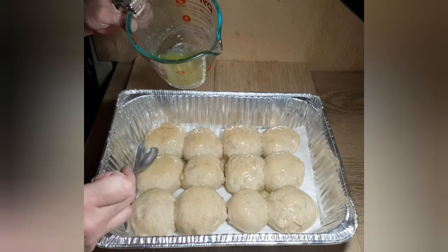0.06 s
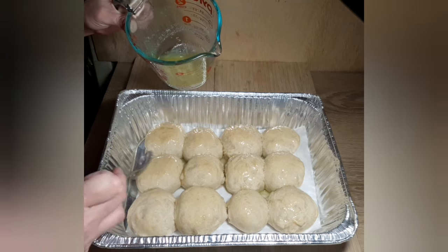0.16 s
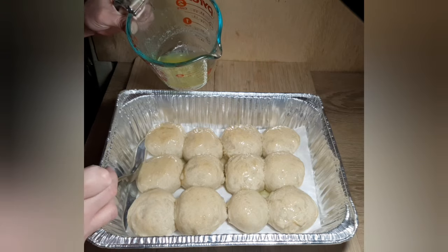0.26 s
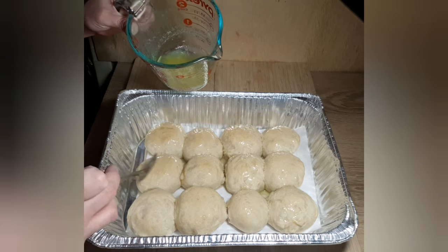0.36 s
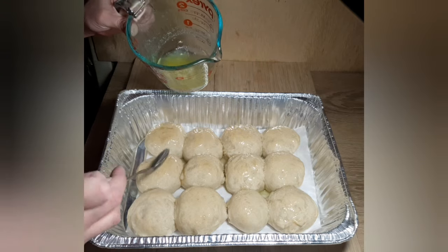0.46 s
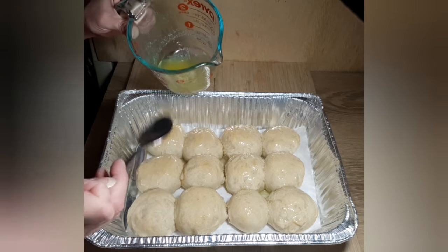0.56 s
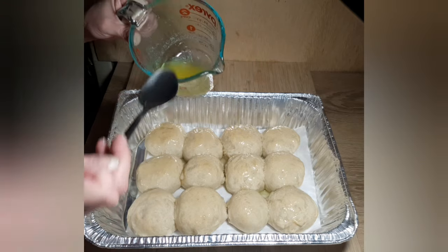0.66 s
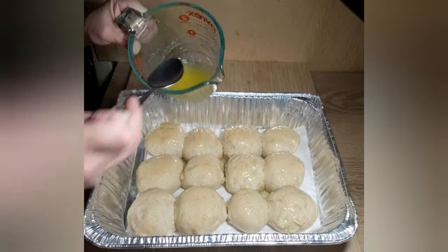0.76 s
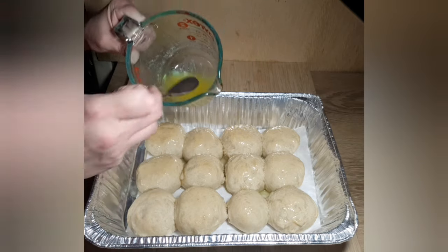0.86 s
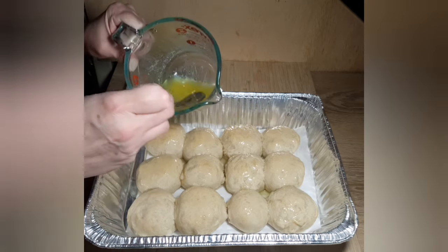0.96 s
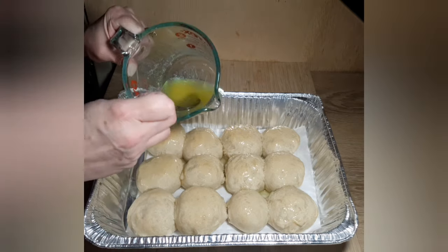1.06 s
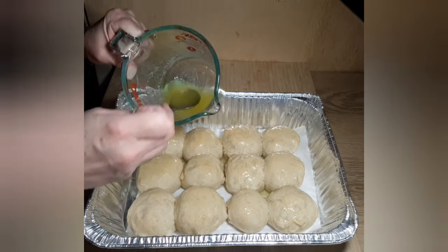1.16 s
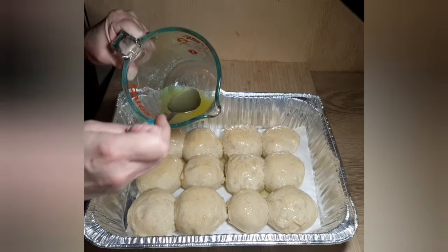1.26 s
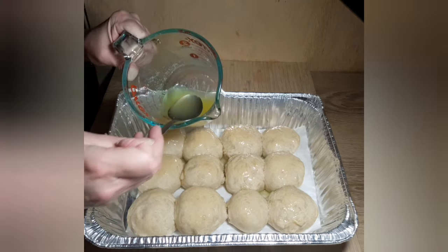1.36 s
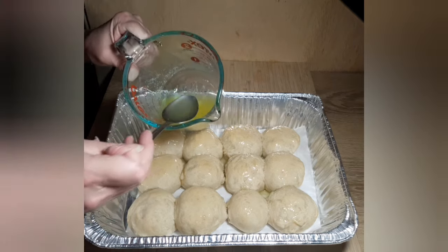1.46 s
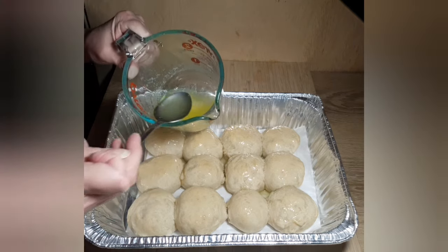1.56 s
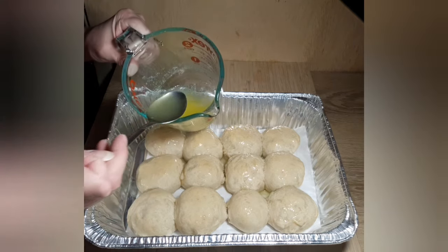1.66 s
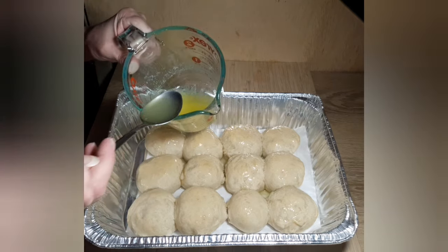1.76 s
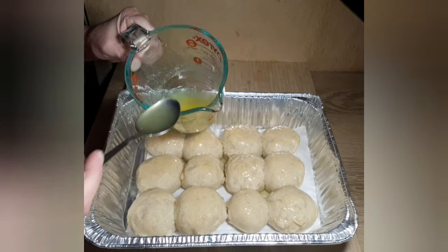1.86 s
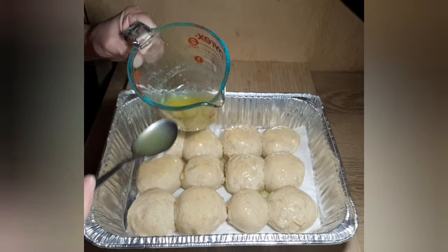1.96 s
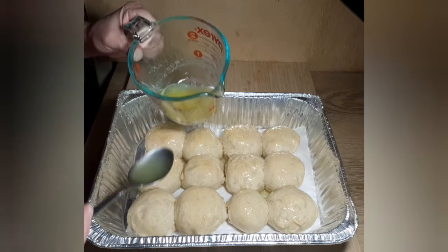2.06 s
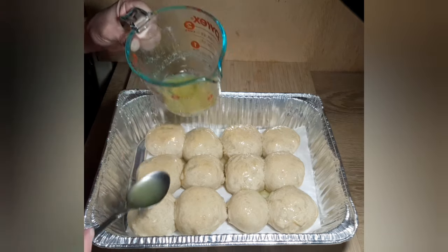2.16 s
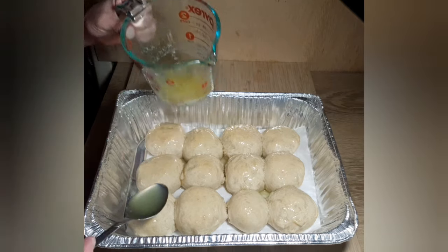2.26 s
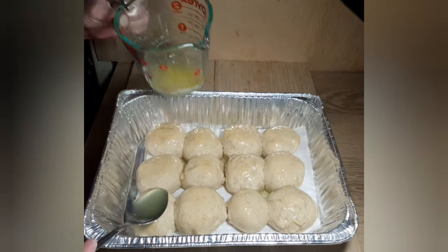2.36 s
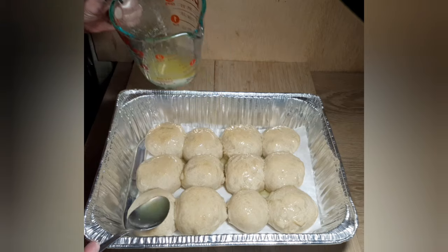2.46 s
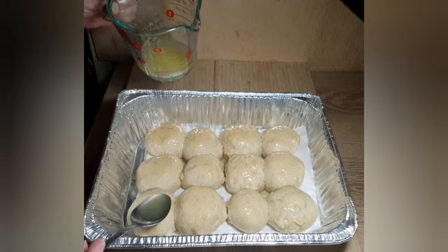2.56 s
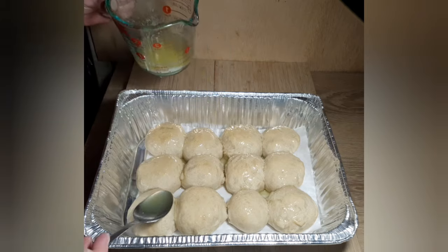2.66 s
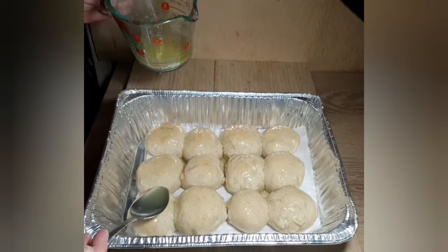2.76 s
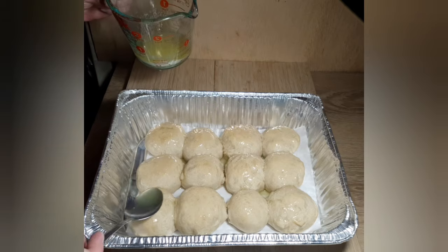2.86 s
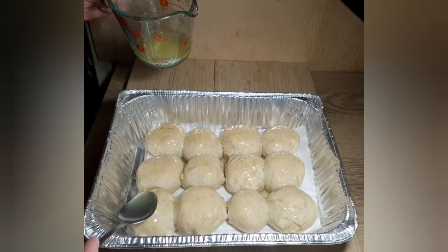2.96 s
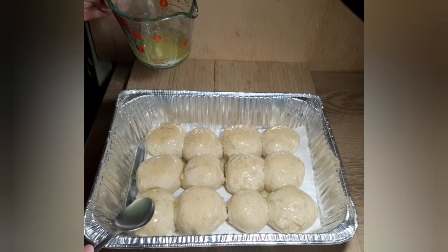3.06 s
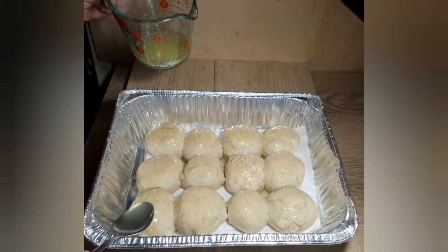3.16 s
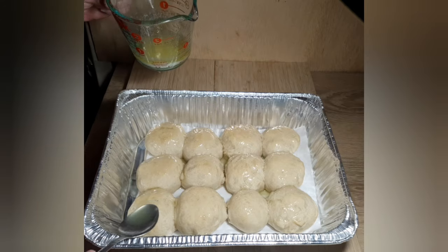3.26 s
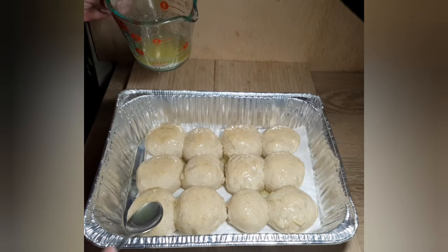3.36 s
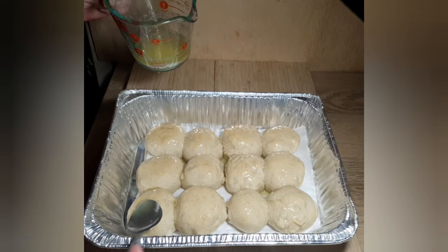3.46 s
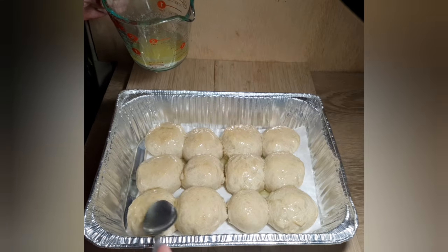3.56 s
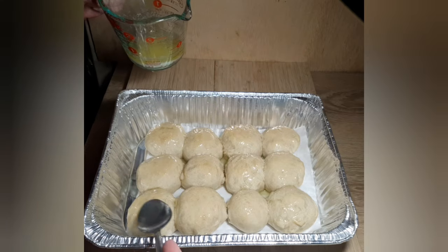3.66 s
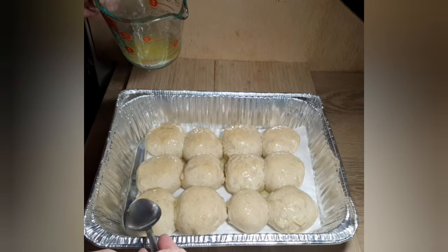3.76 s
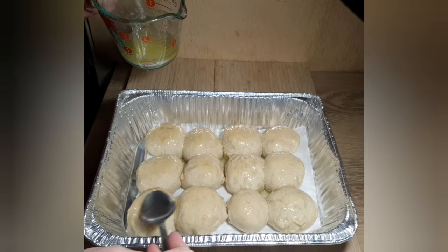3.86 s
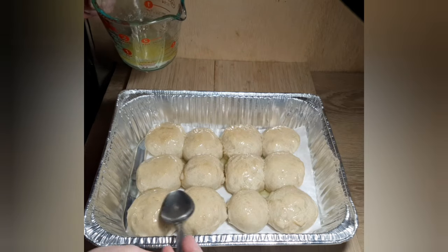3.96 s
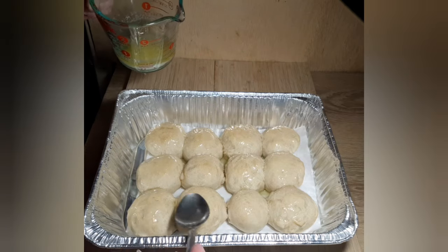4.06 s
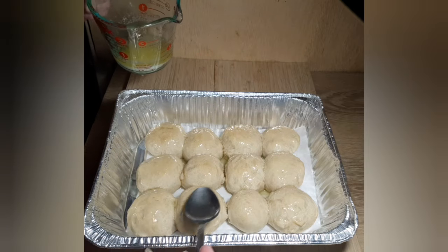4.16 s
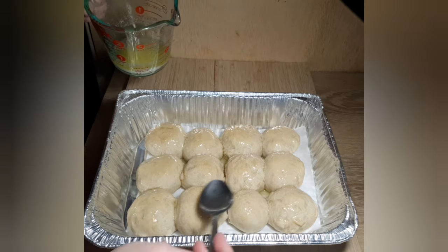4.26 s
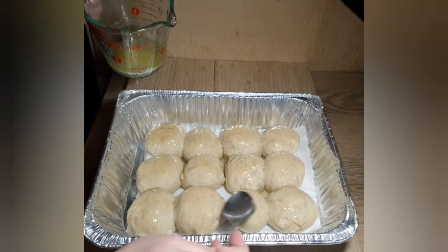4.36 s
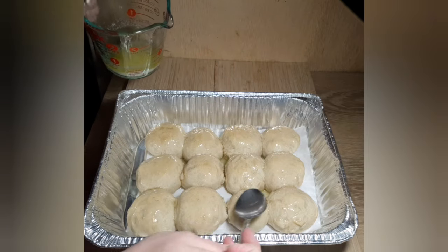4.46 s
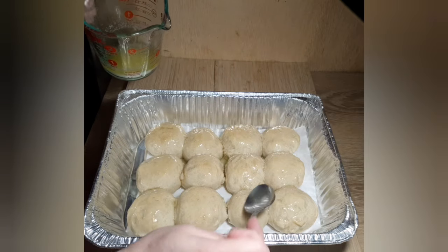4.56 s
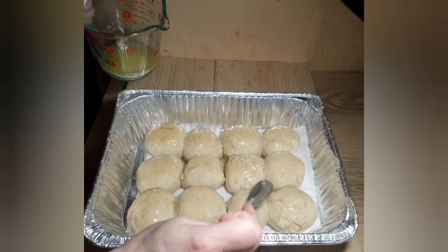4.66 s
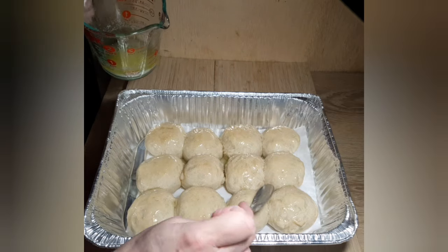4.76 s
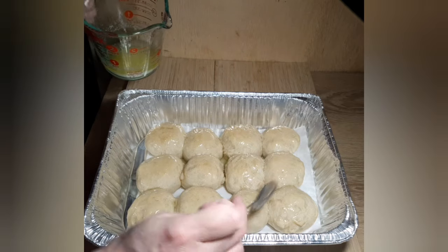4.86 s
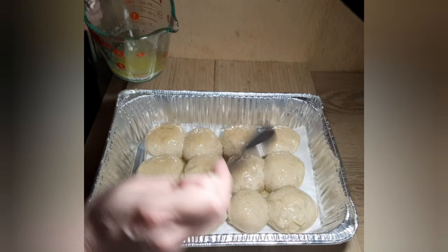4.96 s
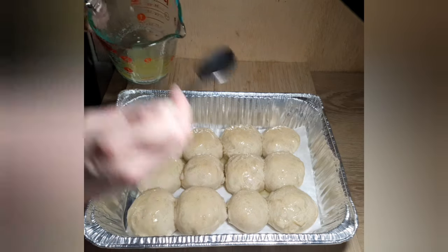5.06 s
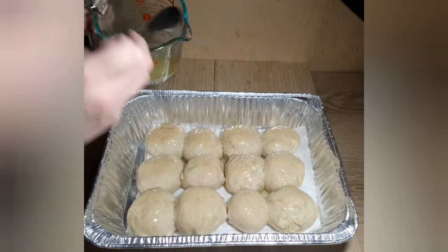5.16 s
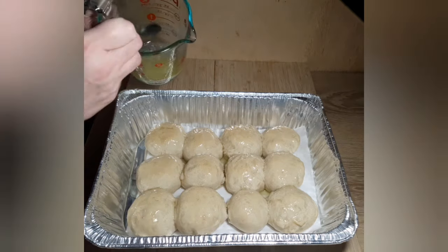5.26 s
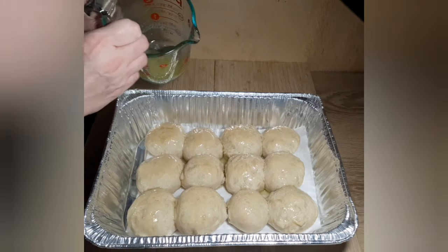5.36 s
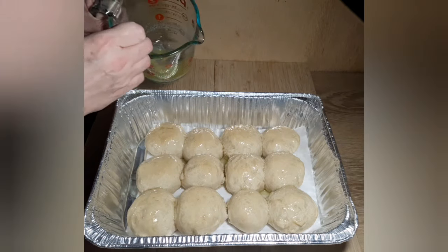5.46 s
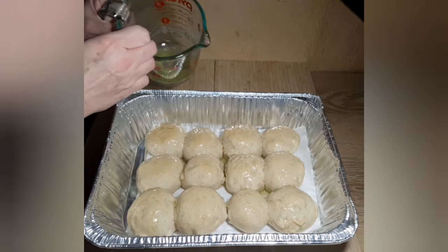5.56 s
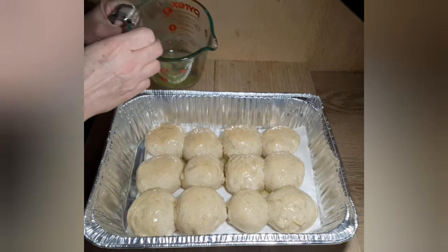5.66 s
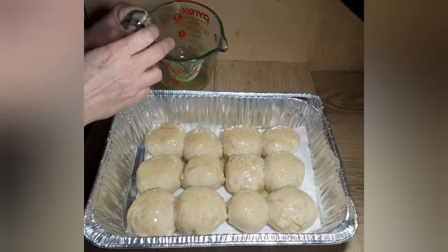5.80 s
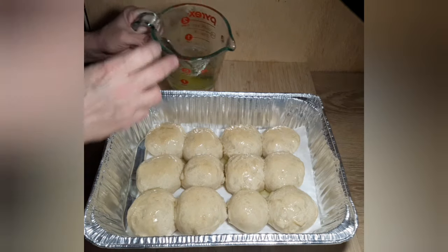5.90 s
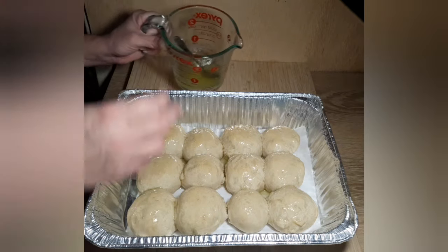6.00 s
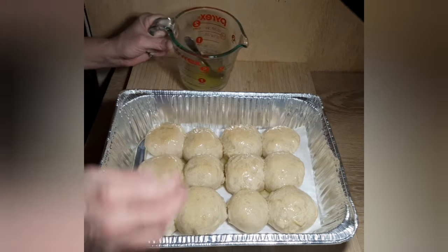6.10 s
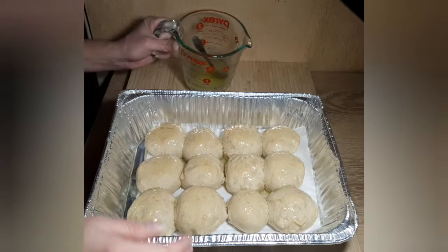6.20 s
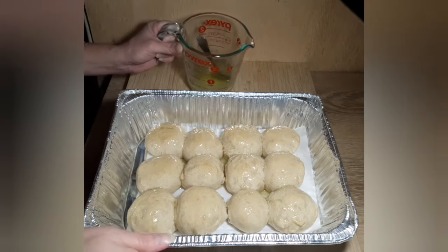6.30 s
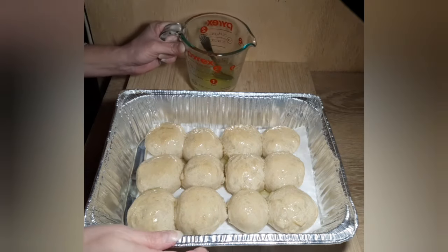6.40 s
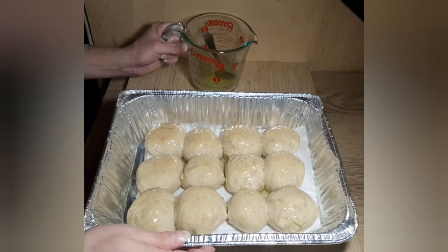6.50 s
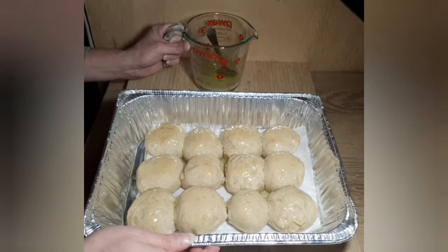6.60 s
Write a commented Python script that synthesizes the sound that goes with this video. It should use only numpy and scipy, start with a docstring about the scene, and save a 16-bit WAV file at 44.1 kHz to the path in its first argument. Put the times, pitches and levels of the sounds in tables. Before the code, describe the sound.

A small, fairly dry kitchen, heard closely in stereo. A refrigerator hums low and quietly throughout, with wavering tones, throbbing rumble, faint hiss and a thin whine. Soft rubbing starts around 0.15 s, with a tiny foil crackle at 0.35 s. A faint spoon tick on thick glass comes at 1.0 s, then a light tilted clink and brief scrape at 1.5 s. From 1.65 to 2.6 s, quick soft brushing strokes repeat about every eighth of a second. At 3.15 s the foil pan pops sharply, crinkling until about 3.35 s. Very faint soft taps and rubs follow from 3.9 to 4.8 s. At 5.5 s the spoon clinks and scrapes glass, hitting loudest and brightest at 5.66 s, with gritty sliding to 5.75 s. Rubbing continues; at 6.3 s the cup knocks on the wooden counter with a glassy clink, and a second dull knock and scrape end it at 6.62 s.

```python
"""A steel spoon clinks on and scrapes along a thick glass measuring cup: blows and sliding grit drive resonant modes.
A foil pan pops and crinkles, with soft taps between, as dying bursts of micro-impacts; the cup is set down on a
wooden counter by short pushes into its modes. Soft rubbing strokes of shaped noise pass between; a refrigerator hums
with wavering tones and throbbing noise. Two spaced microphones hear it all in a small kitchen."""
import sys
import numpy as np
from scipy import signal
from scipy.fft import rfft, irfft, next_fast_len
from scipy.io import wavfile
from scipy.ndimage import uniform_filter1d, map_coordinates

SR = 44100
rng = np.random.default_rng(int(sys.argv[2]) if len(sys.argv) > 2 else 0)


def dump_mix(stems):
    """Bounce the given channels to the path in sys.argv[1] as a 16-bit WAV at rate SR."""
    frames = np.atleast_2d(stems).T  # one column per channel
    limited = np.clip(frames, -1, 1)  # hard clip at full scale
    pcm = np.round(limited * 32767).astype(np.int16)
    wavfile.write(sys.argv[1], SR, pcm)


N = 292559
T = np.arange(N) / SR  # time [s]


def amp(db):
    """Decibel law: level [dB] to amplitude gain."""
    return 10 ** (np.asarray(db) / 20)


def unit(x):
    """Power normalisation: x at rms 1."""
    return x / np.sqrt(np.mean(x ** 2) + 1e-20)


def along(points, hz):
    """Logarithmic frequency scale: interpolate (frequency [Hz], value) points on it."""
    f, v = np.transpose(points)
    return np.interp(np.log(hz + 1), np.log(f + 1), v)


def strokes(rows, rise_s):
    """Power addition of strokes that rise, hold and fade: joint gain, and colour column weighted by power."""
    total, tint = np.zeros((2, N))
    for start, hold, db, colour, fade in rows:
        span = slice(round(start * SR), round(start * SR) + SR)
        age = T[:len(T[span])]
        rise = np.clip(age / rise_s, 0, 1) ** 2
        fall = amp(db - fade * np.clip(age - rise_s - hold, 0, None))
        power = (fall * rise) ** 2
        total[span] += power
        tint[span] += power * colour
    return np.sqrt(total), tint / (total + 1e-30)


def wobble(rate):
    """Slow random modulation: a smooth curve through `rate` random knots a second."""
    knots = rng.standard_normal(int(N * rate / SR) + 4)
    return map_coordinates(knots, [T * rate])


def filtered(x, response):
    """Linear filtering: the spectrum of x times a complex response of frequency, zero-padded."""
    m = next_fast_len(N + SR // 2)
    return irfft(rfft(x, m) * response(np.fft.rfftfreq(m, 1 / SR)), m)[..., :N]


def coloured(x, spectrum):
    """Spectral shaping: x at rms 1 after a smooth spectrum."""
    return unit(filtered(x, lambda hz: amp(along(spectrum, hz))))


def modes(table, widen=1):
    """Modal superposition: causal response of damped resonances, energy 1 for a unit impulse."""
    def response(f):
        h = 0
        for centre, width, db in table:
            loss = 1j * f * width * widen
            h = h + amp(db) * loss / (centre * centre - f * f + loss)
        return h / np.sqrt(np.mean(abs(h) ** 2))
    return response


def grit(spread_db):
    """Friction as dense micro-impacts, rms 1: their sizes have a bounded exponential tail in dB."""
    size = np.minimum(rng.exponential(size=N), 4)
    return unit(rng.standard_normal(N) * amp(spread_db * size))


def wandering(x, depth_db):
    """Moving contact point: it favours now these frequencies, now those."""
    z = signal.stft(x, nperseg=256)[2]
    field = uniform_filter1d(rng.standard_normal(z.shape), size=4, axis=0)
    field = uniform_filter1d(field, size=9, axis=1)
    return unit(signal.istft(z * amp(depth_db * unit(field)), nperseg=256)[1][:N])


# correlation of the spaced microphones: (frequency [Hz], left-right likeness [-1 to 1])
COHERENCE = [(60, 1), (150, 0.8), (380, 1), (950, -0.12), (2380, -0.13), (5980, 0.3), (15000, -0.29)]


def pair(a, b):
    """Spatial coherence: two unrelated versions bleed into each other up to the microphones' likeness."""
    def turn(hz):
        return np.arcsin(np.clip(along(COHERENCE, hz), -1, 1)) / 2
    both = np.array([a, b])
    own = filtered(both, lambda hz: np.cos(turn(hz)))
    return own + filtered(both[::-1], lambda hz: np.sin(turn(hz)))


# compressor tones, the low ones wavering: (frequency [Hz], relative level [dB])
HUM_TONES = [(59.2, -78.5), (86, -77), (117.6, -71), (120, -72), (242, -78), (296, -76.5), (360.5, -68),
             (409, -73.5), (468, -74.5), (764.4, -74.5), (883, -89), (1707, -85.5), (3176, -89.5)]
# the compressor's high whine: (time [s], relative level [dB])
WHINE_LEVEL = [(0, -86), (1.8, -86), (2.7, -81.5), (3.1, -76.5), (3.6, -83.5), (4.2, -77), (4.8, -81),
               (5.9, -79), (6.63, -82)]
# spectrum of the low rumble: (frequency [Hz], relative density [dB])
RUMBLE_SPECTRUM = [(12, -51), (20, -41.5), (63, -8.5), (107, -9), (129, -1), (192, -3.5), (310, -8),
                   (362, 1), (476, -3.5), (546, -14), (694, -15.5), (769, -14.5), (897, -11.5),
                   (960, -43.5), (1200, -20.5), (1560, -49.5), (2640, -120)]
# spectrum of the far hiss: (frequency [Hz], relative density [dB])
HISS_SPECTRUM = [(530, -31), (900, -17.5), (956, -12.5), (1360, -5.5), (1750, -6), (2000, -8),
                 (2810, -11.5), (3140, -5.5), (3500, -13), (6660, -10), (8590, -19), (11400, -11),
                 (14700, -12.5), (15600, -15), (16300, -43.5)]
WHINE_HZ, THROB_HZ, TICKS_PER_S = 3046, 119, 30


def refrigerator():
    """Tones with random phase and level drift, amplitude-modulated rumble, far hiss and faint high ticks."""
    tones = np.zeros((2, N))
    for hz, db in HUM_TONES:
        phase = 2 * np.pi * hz * T + 1.85 * wobble(6) + .5 * wobble(25)
        waver_db = 3.55 / (1 + (hz / 600) ** 4) * wobble(9)  # low tones waver most
        offset = rng.normal(0, hz / 2500, (2, 1))  # phase at each microphone [rad]
        tones += amp(db + 2.5 + waver_db) * np.sin(phase + offset)
    time, db = np.transpose(WHINE_LEVEL)
    whine_phase = 2 * np.pi * WHINE_HZ * T + 0.68 * wobble(11)
    whine_gain = amp(np.interp(T, time, db) + 2.5 + 2.9 * wobble(13))
    tones += whine_gain * np.sin(whine_phase + np.array([[0], [1.5]]))
    throb = 1 + 0.42 * np.sin(2 * np.pi * THROB_HZ * T + wobble(4.2))
    rumble = [amp(-62.5 + 0.41 * wobble(22)) * throb * coloured(rng.standard_normal(N), RUMBLE_SPECTRUM)
              for _ in "ab"]
    hiss = [amp(-72.5 + 2.7 * wobble(2.82)) * coloured(rng.standard_normal(N), HISS_SPECTRUM) for _ in "ab"]
    tick_gain = amp(4.1 * rng.standard_normal(N) + 2.2 * wobble(1.52))
    ticks = (rng.random(N) < TICKS_PER_S / SR) * tick_gain
    ticks = filtered(ticks, modes([(11700, 2900, 0)]))
    ticks = amp(-58.5) * filtered(ticks, modes([(11530, 5500, 0)]))
    return pair(*(tones + rumble + hiss)) + ticks


# soft rubbing strokes: (start [s], hold [s], level [dB], low part re bright part [dB], fade [dB/s])
RUB_STROKES = [(.15, 0.035, -68, -1, 130), (.25, .13, -70.5, 5.5, 197), (.4, 0.14, -85, 13, 300),
               (.87, .1, -75, -5, 100), (1, 0.0243, -64, -4, 68), (1.655, 0.043, -59.5, -5, 181),
               (1.79, .02, -60.5, -6.5, 184), (1.915, 0.0092, -61.5, -6, 194),
               (2.045, 0.025, -63.5, -5.5, 190), (2.165, 0.0316, -63.5, -6.5, 146),
               (2.31, 0.016, -59.5, -4, 145), (2.45, 0.023, -59, -3.5, 188), (2.585, 0.016, -65, -4.5, 160),
               (2.68, 0.21, -70, -5.5, 250), (3.46, 0.14, -79.5, -2, 200), (3.67, 0.018, -76, -1, 250),
               (3.92, 0.026, -72, -6, 26), (4.36, 0.018, -73, 1.5, 70), (4.58, 0.0184, -69, -2, 112),
               (4.75, 0.016, -65.5, -7, 88), (5.17, 0.23, -78.5, -8, 255), (5.78, 0.04, -72, -1.5, 138),
               (5.88, 0.3, -70.5, -0.5, 100), (6.24, 0.019, -63.5, -6, 63), (6.38, 0.18, -61.5, -2, 152)]
# spectrum of the bright part: (frequency [Hz], relative density [dB])
RUB_BRIGHT = [(1470, -66), (2500, -45), (3160, -7.5), (4950, -2), (5870, -4.5), (6760, 3.5), (7830, -11),
              (11100, -11), (14600, -18), (16000, -37)]
# spectrum of the duller part: (frequency [Hz], relative density [dB])
RUB_DULL = [(530, -30), (900, -12), (1040, -14), (1720, -4), (1960, -14), (3200, -14), (4160, -23),
            (7040, -120)]


def rubbing():
    """Sliding friction as noise: a bright hiss and a duller part, diffuse in the room."""
    level, low_db = strokes(RUB_STROKES, rise_s=0.032)
    sides = []
    for _ in "ab":
        bright = coloured(grit(spread_db=2.0), RUB_BRIGHT)
        dull = coloured(grit(spread_db=-0.5), RUB_DULL)
        sides.append(bright + amp(low_db) * dull)
    return level * amp(1.58 * wobble(40)) * pair(*sides)


# foil pops, then soft taps from 3.9 s:
# (time [s], relative level [dB], ring [Hz], ring level [dB], thump level [dB], sizzle level [dB])
POPS_AND_TAPS = [(0.351, -35, 1920, -12, 5.5, -9), (0.366, -35.5, 638, -5, -3, 0),
                 (0.379, -42, 1300, -12, -4, 7.5), (3.146, -11, 1282, -11.5, -48, -25),
                 (3.159, -17.5, 1110, -14, -5, -24), (3.172, -30, 1260, -4, -5, -30),
                 (3.232, -31.5, 1330, -2, -11, -29), (3.249, -29.5, 1180, -4, -4, -30),
                 (3.286, -32.5, 1490, 1, -3, -30), (3.327, -40, 1480, -4, 17, -30),
                 (3.965, -41, 5030, 1, -5, -26), (4.229, -50, 3000, -18, 18.5, -11),
                 (4.381, -42, 1127, 0, 5, -23), (4.6, -52, 1580, -2, 7, -22),
                 (4.679, -48.5, 3130, -22, 21, -19.5), (4.772, -41.5, 5330, 4, 12, 0)]
# bursts of crinkling, each dying away: (start [s], hold [s], level [dB], low panel level [dB], fade [dB/s])
FOIL_CRINKLES = [(.348, 0.023, -50, -3, 450), (3.145, 0.0097, -40, 3, 245), (3.225, 0.028, -49, -1.5, 253),
                 (3.278, 0.0044, -45.5, 4.5, 500), (3.3, 0.018, -57, 12, 260), (3.37, .03, -74, 3, 500)]
# spectrum of the foil sheet: (frequency [Hz], relative density [dB])
SHEET_SPECTRUM = [(880, -71), (1500, -7), (1920, -6.5), (2060, -6), (2540, -5.5), (2740, -8.5),
                  (6760, -2.5), (7840, -14), (14800, -20), (16000, -42)]
# spectrum of the wide floor of the pan: (frequency [Hz], relative density [dB])
PANEL_SPECTRUM = [(200, -6), (450, -3), (800, 0.5), (1300, 2), (1900, -6), (3000, -24)]
# spectrum of the finest creases: (frequency [Hz], relative density [dB])
CREASE_SPECTRUM = [(7000, -35), (9500, -7), (12000, -2), (15000, -6.5), (16000, -18)]
BURST_T60_S, THUMP_T60_S, THUMP_HZ, PANEL_DB = 0.032, 0.025, 376, -7  # shared by every pop and tap


def foil_and_taps():
    """Transient excitation: each pop or tap is a dying burst with one ring and a thump; crinkling is sparse grit."""
    level, low_db = strokes(FOIL_CRINKLES, rise_s=0.0065)
    sheet = coloured(grit(spread_db=6), SHEET_SPECTRUM)
    panel = coloured(grit(spread_db=11.0), PANEL_SPECTRUM)
    out = level * amp(0.92 * wobble(120)) * (sheet + amp(low_db) * panel)
    spectra = (SHEET_SPECTRUM, PANEL_SPECTRUM, CREASE_SPECTRUM)
    layers = np.array([coloured(grit(spread_db=7.5), spectrum) for spectrum in spectra])
    t = T[:SR // 5]
    for time, db, hz, ring_db, thump_db, sizzle_db in POPS_AND_TAPS:
        i = round(time * SR)
        crackle = amp([0, PANEL_DB, sizzle_db]) @ layers[:, i:i + len(t)]
        crackle *= amp(-60 * t / BURST_T60_S)
        ring = amp(ring_db - 60 * t / (3.0 * BURST_T60_S)) * np.sin(2 * np.pi * hz * t)
        thump = amp(thump_db - 60 * t / THUMP_T60_S) * np.sin(2 * np.pi * THUMP_HZ * t)
        thump *= 1 - np.exp(-t / 0.0028)  # soft onset
        out[i:i + len(t)] += amp(db - 11.0) * (crackle + ring + thump)
    return out


# spoon blows on the glass: (time [s], relative level [dB], upright share against tilted [0-1])
SPOON_BLOWS = [(1.0244, -35.5, 0.84), (1.515, -26, 0), (5.488, -17.5, 0.93), (5.4944, -18.5, 1),
               (5.5907, -27.5, 1), (5.6575, -4, 0.99), (5.6795, -11, 1), (5.6846, -12.5, 0.89),
               (6.2976, -21.5, 0.6), (6.3123, -29, 1)]
# spoon sliding on the glass: (start [s], hold [s], level [dB], upright share [0-1], fade [dB/s])
SPOON_SLIDES = [(1.513, 0.052, -46.5, 0, 300), (1.575, 0.053, -45, 0, 598), (5.489, 0.0032, -33, 0.99, 801),
                (5.53, 0.019, -55, 0.7, 302), (5.593, 0.13, -31.5, 0.98, 600), (5.655, 0.054, -28, 1, 261),
                (5.725, 0.026, -29, 0.99, 1500), (5.776, 0.012, -64, 0.72, 400),
                (6.297, 0.019, -33.5, 0.7, 452), (6.627, .02, -24.5, 0, 400)]
# ring of spoon and cup, standing upright: (frequency [Hz], width before damping [Hz], relative level [dB])
UPRIGHT_MODES = [(1344, 22, -15), (2750, 57, -13.5), (3700, 115, -7), (4003, 40, -5.5), (5060, 75, -15.5),
                 (5000, 24, -16), (6260, 70, -1.5), (6295, 99, 4.5), (6270, 50, -14), (7100, 35, -7.5),
                 (7270, 28, 2.5), (7878, 28, -18), (8140, 15, -19.5), (9350, 140, -13), (10220, 79, -12),
                 (10800, 43, -11), (11230, 43, -24.5), (12440, 89, -12.5), (12800, 92, -13),
                 (14100, 240, -13), (13600, 40, -15), (14440, 45, -14), (15200, 50, -21.5)]
# ring of spoon and cup, held tilted: (frequency [Hz], width before damping [Hz], relative level [dB])
TILTED_MODES = [(814, 120, -7.5), (1805, 110, -4.5), (2373, 106, 1.5), (3267, 56, 7), (3560, 27, -4),
                (4420, 65, -6), (5063, 66, 3.5), (5300, 73, -12.5), (6220, 70, 7.5), (7150, 64, -6),
                (7760, 53, -25), (9650, 210, -8), (11400, 80, -32), (12430, 180, -22), (14200, 35, -13)]
# steel on glass, between the modes: (frequency [Hz], relative density [dB])
CONTACT_SPECTRUM = [(300, -38), (600, -54.5), (1500, -7), (3600, -11.5), (6400, 6.5), (7800, -9),
                    (8800, -30.5), (11000, -15.5), (15000, -24.5), (16000, -30)]
DAMPING = 1.3  # widens every mode by this factor
CONTACT_S = .0033  # a blow's envelope peaks after a quarter of this
BLOW_RASP_DB, SLIDE_RASP_DB = -11, -10.5  # drive of the broad rasp against blow and slide


def spoon_on_glass():
    """Impact and friction excitation: modes of spoon and cup, upright or tilted, ring; contact adds a broad rasp."""
    slide, share = strokes(SPOON_SLIDES, rise_s=.004)
    slide = slide * wandering(grit(spread_db=2), depth_db=2.5) * amp(2.5 * wobble(200))
    upright, tilted = np.sqrt(np.clip([share, 1 - share], 0, 1)) * slide  # share of power
    rasp = amp(SLIDE_RASP_DB) * slide
    t = T[:SR // 50]
    u = 4 * t / CONTACT_S
    for time, db, part in SPOON_BLOWS:
        span = slice(round(time * SR), round(time * SR) + len(t))
        blow = u * np.exp(-u) * rng.choice([-1, 1], len(t))  # micro-bounces while the steel touches
        blow = amp(db + 15.5) * blow / np.linalg.norm(blow)
        upright[span] += np.sqrt(part) * blow
        tilted[span] += np.sqrt(1 - part) * blow
        rasp[span] += amp(BLOW_RASP_DB) * blow
    broad = filtered(rasp, lambda hz: unit(amp(along(CONTACT_SPECTRUM, hz))))
    ringing = filtered(upright, modes(UPRIGHT_MODES, DAMPING)) + filtered(tilted, modes(TILTED_MODES, DAMPING))
    return ringing + broad


# soft touches, then the cup, on the counter: (time [s], relative level [dB], contact [s])
COUNTER_TOUCHES = [(3.965, -34.5, .004), (4.229, -40.5, 0.0022), (4.381, -41, 0.00075),
                   (4.608, -39, 0.0019), (4.77, -38.5, 0.0022), (6.2916, -21.5, 0.00043),
                   (6.2937, -15.5, 0.00046), (6.297, -20.5, 0.0007), (6.3, -29, .0008),
                   (6.308, -32, 0.0022), (6.319, -38.5, 0.0011), (6.612, -26, 0.00067),
                   (6.615, -20, 0.00075), (6.62, -24, .002), (6.628, -13.5, 0.0031)]
# resonances of the wooden top: (frequency [Hz], width [Hz], relative level [dB])
COUNTER_MODES = [(103, 54, -8.5), (139, 52, -9), (238, 56, 4.5), (379, 95, -5.5), (430, 79, -3),
                 (565, 200, -1.5), (797, 28, -5.5), (1315, 155, -11.5), (1440, 47, -32)]
HARD_S, CRACK_T60_S = .0005, .012  # crack strength goes as HARD_S over contact time


def counter():
    """Contact-time low-pass: the longer a push into the wooden top, the duller it is and the fainter its crack."""
    push, crack = np.zeros((2, N + SR))
    t = T[:SR // 50]
    for time, db, contact in COUNTER_TOUCHES:
        span = slice(round(time * SR), round(time * SR) + len(t))
        soft = np.sin(np.pi * np.clip(t / contact, 0, 1)) ** 2
        push[span] += amp(db + 20.5) * soft / soft.sum()
        crack_gain = amp(db - 15.5 - 60 * t / CRACK_T60_S) * HARD_S / contact
        crack[span] += crack_gain * rng.standard_normal(len(t))
    return filtered(push[:N], modes(COUNTER_MODES)) + filtered(crack[:N], modes([(2000, 1100, 0)]))


# reverberation time of the small kitchen: (frequency [Hz], t60 [s])
KITCHEN_T60 = [(200, 0.21), (1500, 0.14), (6000, 0.068), (15000, 0.065)]


def kitchen(x):
    """Time-varying reverberation off close walls and cupboards: a new decaying-noise tail every eighth second."""
    out, step = np.zeros((2, N + SR)), SR // 8
    for i in range(0, N, step):
        hz, t, z = signal.stft(rng.standard_normal((2, SR // 4)), SR, nperseg=128)
        decay = amp(-60 * t / along(KITCHEN_T60, hz)[:, None])
        tail = signal.istft(z * decay, SR, nperseg=128)[1]
        tail *= amp(-5) / np.linalg.norm(tail, axis=1, keepdims=True)
        wet = signal.fftconvolve(x[None, i:i + step], tail, axes=1)
        out[:, i:i + wet.shape[1]] += wet
    return pair(*out[:, :N])


def placed(x, lag_s, lean_db):
    """Time and level differences: the left microphone hears x lag_s later and lean_db louder than the right."""
    def response(hz):
        lean = amp(np.array([[.5], [-.5]]) * lean_db)
        return lean * np.exp(1j * np.pi * lag_s * np.outer([-1, 1], hz))
    return filtered(x, response)


def scene():
    """Superposition: close sources direct and off the walls, over the rubbing and the hum."""
    glass, pan, top = spoon_on_glass(), foil_and_taps(), counter()
    direct = placed(glass, lag_s=-0.0002557, lean_db=-2.1)
    direct += placed(pan, lag_s=.00005, lean_db=0)
    direct += placed(top, lag_s=0, lean_db=1.5)
    hum = placed(refrigerator(), lag_s=0.00032, lean_db=0)  # it stands nearer the right microphone
    return 0.61 * direct + kitchen(glass + pan + top) + rubbing() + hum


# balance of the microphones: (frequency [Hz], left minus right [dB])
LEFT_MINUS_RIGHT = [(60, -1.5), (130, 3.5), (290, 5.5), (640, 2.5), (1410, 1), (3100, 3), (6820, 1),
                    (15000, 3)]
BASS_CUT_HZ, TOP_HZ = 48, 15700


def record(dry):
    """Band limiting: deep bass is cut, nothing passes above TOP_HZ; the left is louder save in the lowest bass."""
    def response(hz):
        balance = amp(np.outer([.5, -.5], along(LEFT_MINUS_RIGHT, hz)))
        return balance * (hz < TOP_HZ) / np.sqrt(1 + (BASS_CUT_HZ / (hz + 1)) ** 6)
    return filtered(dry, response)


dry = scene()
out = record(dry)
dump_mix(out)
```